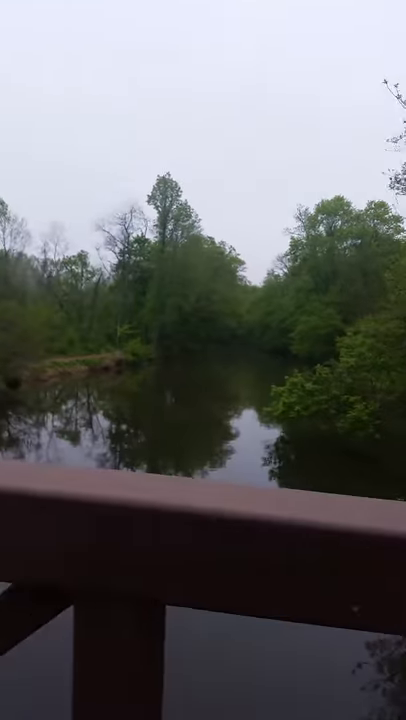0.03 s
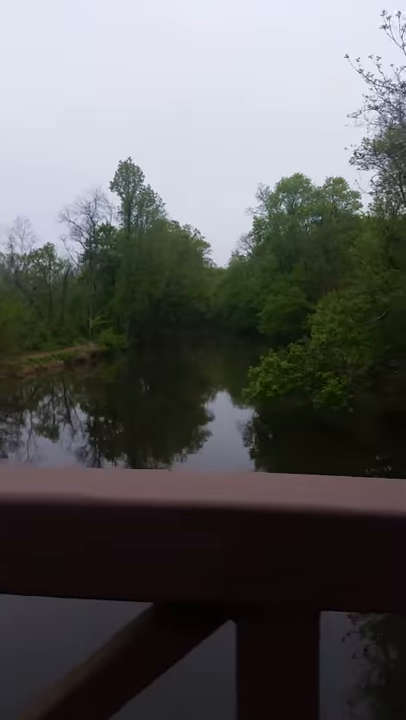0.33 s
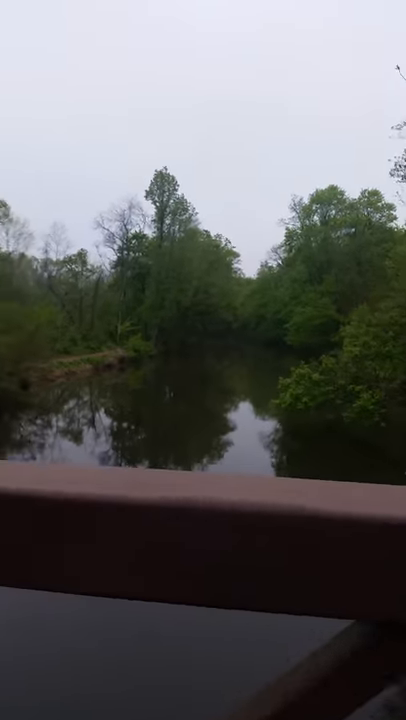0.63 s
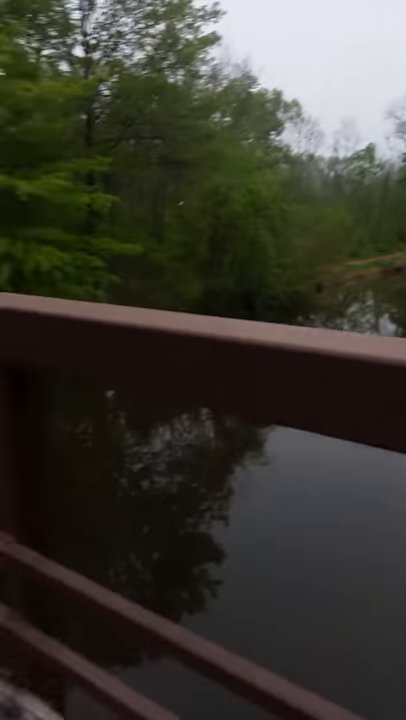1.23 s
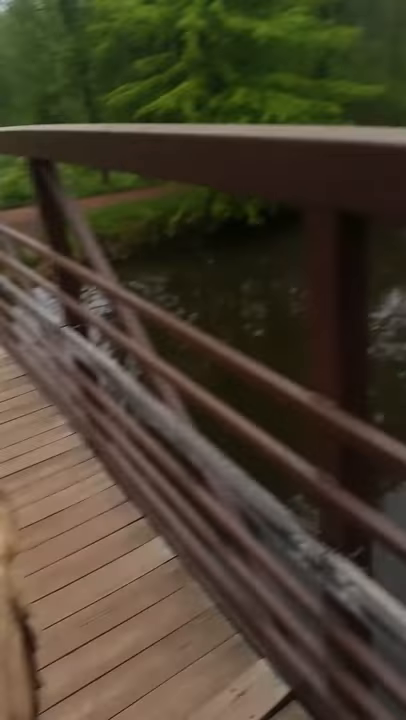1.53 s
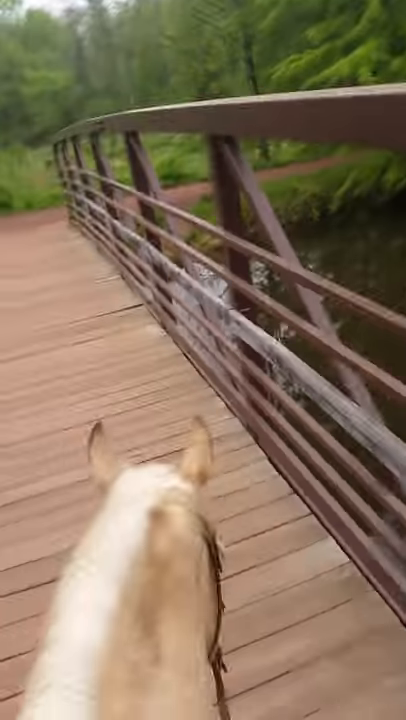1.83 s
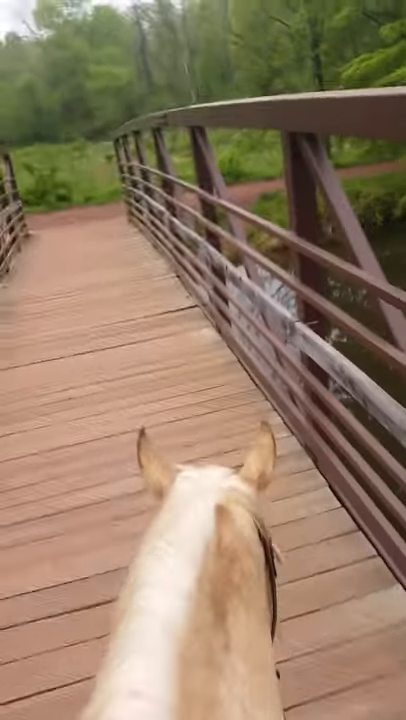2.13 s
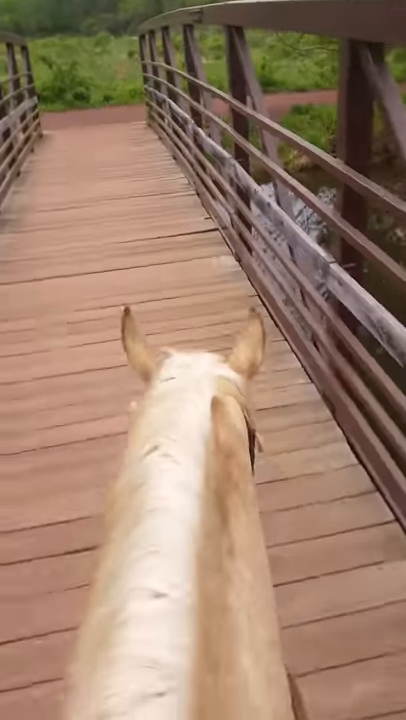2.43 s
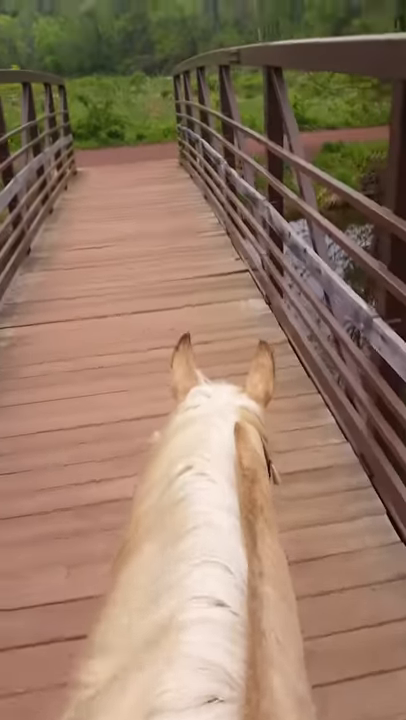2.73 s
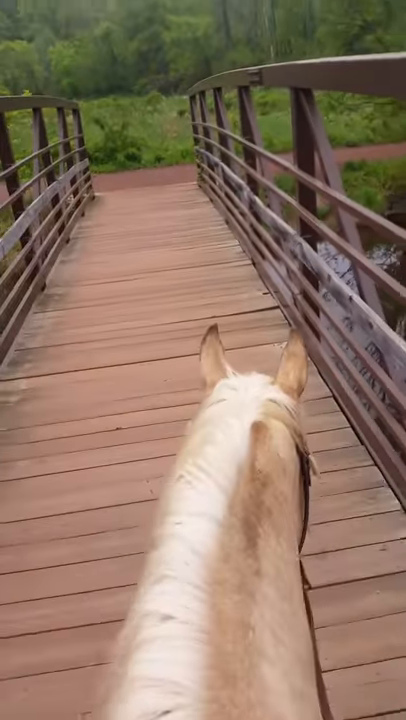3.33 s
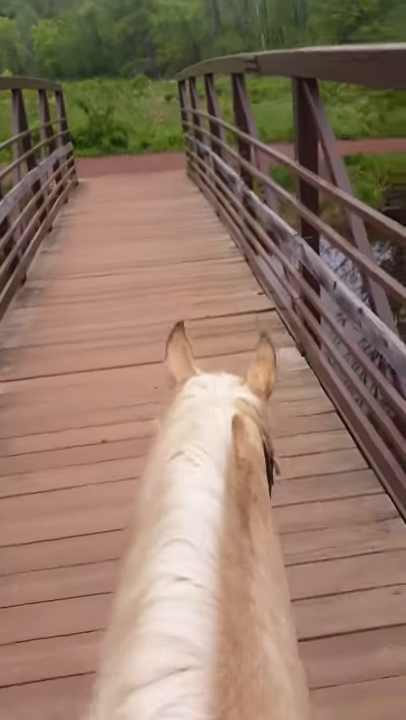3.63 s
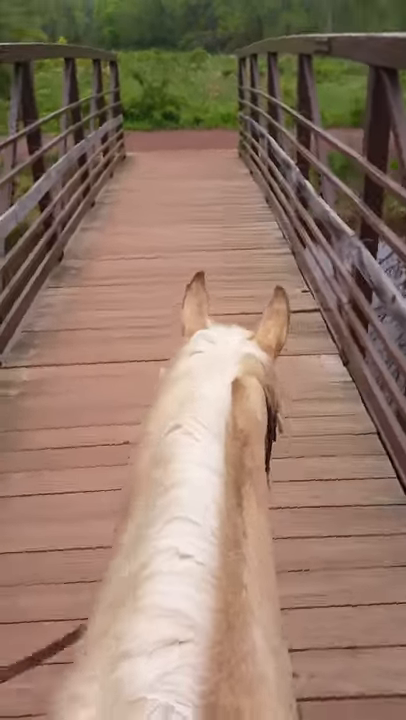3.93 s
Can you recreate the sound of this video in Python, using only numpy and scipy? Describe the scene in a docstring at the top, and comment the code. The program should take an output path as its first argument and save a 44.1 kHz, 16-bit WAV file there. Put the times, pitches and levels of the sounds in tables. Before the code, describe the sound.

A horse walks over a wooden footbridge, heard from the saddle, each hoof knocking on the planks with a hollow boom. A sparrow whistles and trills early on, distant birds warble, and the last step skids slightly.

```python
"""A horse walks over the plank deck of a steel footbridge, heard from the saddle with the right
microphone port muffled. From the start, over a low rumble of air, each hoof touches with its toe, lands,
knocks a plank and sets the whole span booming. In the first two seconds a sparrow whistles and trills
from the trees around the pond; farther birds warble on and off. Midway the tack ticks and a far bird
repeats an upslur. Near the end the rider's clothes rustle and the last hoof skids on the wood."""
import sys
import numpy as np
from scipy import signal
from scipy.fft import rfft, irfft, next_fast_len
from scipy.io import wavfile
from scipy.ndimage import map_coordinates

SR = 44100
rng = np.random.default_rng(int(sys.argv[2]) if len(sys.argv) > 2 else 0)


def transcribe(u):
    """Save the signal u as a 16-bit wav file named by the first command-line argument.

    u: samples, shape (n,) or (channels, n), limited to [-1, 1]; the rate is SR.
    q: integer samples, one column per channel.
    """
    v = np.clip(np.atleast_2d(u).T, -1, 1)
    q = np.round(v * 32767).astype(np.int16)
    wavfile.write(sys.argv[1], SR, q)


N = 176400


def amp(db):
    """The decibel law: 20 dB is a factor of ten in amplitude."""
    return 10 ** (np.asarray(db) / 20)


def unit_rms(x):
    """Power normalisation: the mean square becomes 1."""
    return x / np.sqrt(np.mean(x ** 2) + 1e-20)


def unit_energy(x):
    """Energy normalisation: each channel's squares sum to 1."""
    return x / np.linalg.norm(x, axis=-1, keepdims=True)


def decay(t, t60):
    """Exponential damping: 60 dB are lost in t60 seconds."""
    return amp(-60 * t / t60)


def along(points, hz):
    """Interpolation of (Hz, value) points on a logarithmic frequency axis."""
    freqs, values = np.transpose(points)
    return np.interp(np.log(hz + 1), np.log(freqs + 1), values)


def add(out, start, x):
    """Superposition: x joins out at start seconds."""
    i = max(0, round(start * SR))
    part = x[..., :max(0, out.shape[-1] - i)]
    out[..., i:i + part.shape[-1]] += part


def coloured(x, *curves):
    """Minimum-phase filtering by (Hz, dB) curves in cascade, whose decibels add."""
    n = x.shape[-1]
    size = 2 * next_fast_len(n // 2 + SR // 8)
    hz = np.fft.rfftfreq(size, 1 / SR)
    gain = amp(sum(along(curve, hz) for curve in curves))
    cepstrum = irfft(np.log(gain), size)
    cepstrum[1:size // 2] *= 2  # folding onto positive time makes the filter causal
    cepstrum[size // 2 + 1:] = 0
    return irfft(rfft(x, size) * np.exp(rfft(cepstrum)), size)[..., :n]


def stereo_noise(n, spread):
    """Partial coherence: shared white noise plus each side's own, weighted by spread."""
    return unit_rms(rng.standard_normal(n) + spread * rng.standard_normal((2, n)))


def shaped_noise(n, spectrum, spread):
    """Spectral shaping: white stereo noise takes on a filter's spectrum, at rms 1."""
    return unit_rms(coloured(stereo_noise(n, spread), spectrum))


def wobble(rate, n):
    """Random modulation: a smooth curve through rate random knots a second."""
    return map_coordinates(rng.standard_normal(SR // 20), [np.arange(n) / SR * rate])


def diffuse_tail(t60_curve, spread):
    """Modal overlap: a second of dense ringing acts as noise, each band dying at its own rate."""
    hz, t, bands = signal.stft(stereo_noise(SR, spread), SR, nperseg=256)
    bands = bands * decay(t, along(t60_curve, hz)[:, None])
    return signal.istft(bands, SR, nperseg=256)[1][:, :SR]


# Spectra of the air and of the leaves, the latter with a far bird chorus blurred in near 3.5 kHz. Each row:
# frequency in Hz, relative level in dB.
AIR_SPECTRUM = [(25, -9), (46, 13), (75, 7.5), (120, 4), (250, -4.5), (450, -18), (700, -20.5),
                (1100, -34.5), (2000, -53), (5000, -74)]
LEAF_SPECTRUM = [(2000, 17), (2800, 14), (3550, 14), (4200, 7), (5500, 12.5), (7500, 0), (10000, -25)]
def air(rumble_db=-35, swell_db=1.5, leaves_db=-64):
    """Amplitude modulation: low outdoor rumble swells a little under a faint, steady hiss of leaves, with a far
    chorus of birds blurred into it near 3.5 kHz."""
    rumble = shaped_noise(N, AIR_SPECTRUM, spread=.22)
    leaves = shaped_noise(N, LEAF_SPECTRUM, spread=.83)
    return amp(rumble_db + swell_db * wobble(rate=7, n=N)) * rumble + amp(leaves_db) * leaves


def whistle(length, start_hz, middle_hz, end_hz, db, waver_hz=11, waver_db=1.2):
    """Frequency modulation: a pure tone glides on a parabola, slightly unsteady in pitch and level."""
    n = int(length * SR)
    progress = np.arange(n) / n
    glide = np.polyfit([0, .5, 1], [start_hz, middle_hz, end_hz], 2)
    hz = np.polyval(glide, progress) + waver_hz * wobble(rate=70, n=n)
    ramp = np.clip(np.minimum(progress, 1 - progress) / .3, 0, 1)  # 30% rising, 30% fading
    envelope = amp(db + waver_db * wobble(rate=70, n=n)) * np.sin(np.pi / 2 * ramp)
    return envelope * np.sin(2 * np.pi * np.cumsum(hz) / SR)


def trill(length=.25, centre_hz=5220, fall_hz=193, sweep_hz=1150, strokes_per_s=65, db=-45):
    """Sawtooth frequency modulation: quick downstrokes merge into a buzz that swells, sinks and fades."""
    t = np.arange(int(length * SR)) / SR
    progress, stroke = t / length, t * strokes_per_s % 1
    hz = centre_hz + fall_hz * (.5 - progress) + sweep_hz * (.5 - stroke)
    envelope = amp(db) * np.sin(np.pi * progress) * np.sin(np.pi * stroke) ** 2
    return envelope * np.sin(2 * np.pi * np.cumsum(hz) / SR)


# Reverberation among the trunks. Each row: frequency in Hz, 60 dB decay time in seconds.
TRUNK_DECAY = [(3000, 1.9), (7000, 1.5)]
def through_trees(song, direct, trunks_db=-4, leaves_t60=.09):
    """Multipath propagation: song arrives straight, scattered by leaves and echoed among trunks."""
    t = np.arange(SR) / SR
    trunks = amp(trunks_db) * unit_energy(diffuse_tail(TRUNK_DECAY, spread=.67))
    leaves = unit_energy(stereo_noise(SR, spread=.93) * decay(t, leaves_t60))
    scattered = signal.fftconvolve(song[None], trunks + leaves, axes=1)[:, :N]
    return (direct * song + scattered) / np.hypot(1, direct)


# Bird notes. Each row: start and length in seconds, first, middle and last pitch in Hz, level in dB.
SPARROW_NOTES = [(0.269, 0.048, 6100, 7060, 7300, -63), (0.344, 0.22, 5010, 4946, 4878, -48.5),
                 (0.622, 0.032, 5620, 6840, 7100, -56), (0.973, 0.02, 5280, 4890, 4920, -45.5),
                 (1.091, .115, 7340, 6710, 6600, -50), (1.201, 0.028, 5040, 5010, 5240, -51),
                 (1.285, 0.04, 6040, 6730, 7300, -56), (1.406, 0.15, 7600, 7060, 7080, -51.5),
                 (1.541, 0.028, 5240, 4950, 4900, -53), (1.635, 0.051, 5800, 6920, 7450, -58)]
WARBLER_NOTES = [(0.062, 0.079, 3590, 3180, 2610, -54), (0.115, 0.054, 3320, 3770, 3120, -54.5),
                 (1.159, 0.11, 4960, 3360, 2370, -61), (1.269, 0.13, 2590, 3610, 3575, -55.5),
                 (2.416, 0.13, 4090, 4360, 4300, -59), (2.518, 0.057, 5500, 4500, 3950, -57.5),
                 (2.597, 0.036, 3760, 3160, 2750, -55.5), (2.623, 0.064, 3080, 3820, 2530, -53.5),
                 (2.689, 0.041, 2620, 3540, 5010, -51), (2.741, 0.057, 3476, 3580, 3510, -56),
                 (3.72, 0.12, 5280, 3470, 2420, -58), (3.881, 0.11, 5120, 3560, 2460, -53.5)]
# A far bird's upslur: one such row without the start.
UPSLUR = (.075, 1900, 2850, 3600, -62)
def birds(trill_start=.725, upslur_start=1.435, upslur_period=.178, gain_db=-2):
    """Direct-to-reverberant ratio conveys distance: the sparrow is near, the other birds farther off."""
    near, far = np.zeros((2, N))
    for start, *note in SPARROW_NOTES:
        add(near, start, whistle(*note))
    add(near, trill_start, trill())
    for start, *note in WARBLER_NOTES:
        add(far, start, whistle(*note))
    for k in range(6):
        add(far, upslur_start + k * upslur_period, amp(rng.normal(0, 2)) * whistle(*UPSLUR))
    return amp(gain_db) * (through_trees(near, direct=1.1) + through_trees(far, direct=.6))


# Brushes of the rider's clothes. Each row: start in seconds, length in seconds, peak level in dB.
CLOTH_BRUSHES = [(0, .35, -72.5), (3.1, 0.48, -68.5), (3.653, 0.43, -62)]
# Their spectrum. Each row: frequency in Hz, relative level in dB.
CLOTH_SPECTRUM = [(1500, 3), (5500, 3.5), (8000, -4.5), (11000, -12.5)]
def rustle():
    """Friction noise: cloth brushes softly as the rider sways."""
    envelope = np.zeros(N)
    for start, length, db in CLOTH_BRUSHES:
        add(envelope, start, amp(db) * np.hanning(int(length * SR)))
    return envelope * shaped_noise(N, CLOTH_SPECTRUM, spread=3.2)


def snap(db, spectrum, t60=.04):
    """A contact transient: a brief touch gives a broad band of quickly damped noise."""
    t = np.arange(SR // 5) / SR
    return amp(db) * decay(t, t60) * shaped_noise(len(t), spectrum, spread=.41)


# Ticks of the tack. Each row: start in seconds, level in dB.
TACK_TICKS = [(1.612, -35.5), (1.615, -48), (2.495, -44)]
# Their spectrum. Each row: frequency in Hz, relative level in dB.
TACK_SPECTRUM = [(500, -2.5), (1100, 16.5), (2500, 8.5), (6500, 2.5), (10000, -24.5), (15000, -7.5)]
def tack():
    """Light impacts: bridle and saddle give small, bright ticks."""
    out = np.zeros((2, N))
    for start, db in TACK_TICKS:
        add(out, start, snap(db, TACK_SPECTRUM))
    return out


DECK_SPREAD = .55
# Damping of the deck. Each row: frequency in Hz, 60 dB decay time in seconds.
DECK_DECAY = [(50, 0.81), (160, 1), (420, 0.4), (1100, 0.53), (2000, 0.36), (3300, 0.18), (9000, 0.047)]
def deck_ring():
    """Structural reverberation: many loose planks and girders answer a blow."""
    return diffuse_tail(DECK_DECAY, DECK_SPREAD) / np.sqrt(SR / 20)


# Loose planks bumping under the horse. Each row: start in seconds, pitch in Hz, level in dB.
PLANK_BUMPS = [(.022, 193.4, -11.5), (0.115, 125, -20.5), (.672, 136, -21), (1.358, 241.3, -16),
               (1.489, 112, -12), (1.706, 320, -19.5), (2.072, 115.8, -9.5), (2.854, 145.3, -19),
               (3.58, 220.3, -15)]
def loose_planks(t60=.17, ring_db=-10):
    """Damped resonance: planks drop on their girders as the weight shifts, each with a hollow note."""
    out, t = np.zeros((2, N)), np.arange(SR // 3) / SR
    for start, hz, db in PLANK_BUMPS:
        blow = amp(ring_db) * deck_ring()
        blow[:, 0] += 1  # the direct impulse
        attack = 1 - np.exp(-2 * hz * t)
        note = amp(db) * attack * decay(t, t60) * np.sin(2 * np.pi * hz * t)
        add(out, start, signal.fftconvolve(blow, note[None], axes=1))
    return out


# Spectrum of a hoof sliding on wood. Each row: frequency in Hz, relative level in dB.
SKID_SPECTRUM = [(400, -29), (680, 8.5), (1060, 6), (1250, -20), (8000, -59)]
def skid(start=3.891, db=-25, attack_s=.0024, t60=.26, roughness=1.2):
    """Sliding friction: the last hoof skids a little over the grain of the wood."""
    out, t = np.zeros((2, N)), np.arange(SR // 3) / SR
    slips = stereo_noise(len(t), DECK_SPREAD) * np.exp(roughness * rng.uniform(-1.3, 1, len(t)))
    envelope = amp(db) * (1 - np.exp(-t / attack_s)) * decay(t, t60)
    add(out, start, envelope * unit_rms(coloured(slips, SKID_SPECTRUM)))
    return out


# Modes of the span. Each row: frequency in Hz, level relative to the boom in dB, decay time in seconds.
SPAN_MODES = [(48.95, -5.5, 1.1), (112.67, -9.5, 1.55), (147.8, -17.5, 1.36)]
def span_boom(boom_db, attack_s=.00093, detune=.0073):
    """Free vibration: after a blow the whole span swings on in its low modes."""
    t, boom = np.arange(SR) / SR, np.zeros(SR)
    for hz, db, t60 in SPAN_MODES:
        hz *= 1 + rng.normal(0, detune)
        boom -= amp(boom_db + db) * decay(t, t60) * np.sin(2 * np.pi * hz * t)
    return boom * (1 - np.exp(-t / attack_s))


# Modes of plank and steel railing. Each row: frequency in Hz, level in dB, decay time in seconds.
PLANK_MODES = [(183.9, -21, .25), (361.5, -28, 0.14), (413.5, -20, 0.17), (595.7, -24, 0.16),
               (858, -12.5, 0.077), (936.3, -21, 0.13), (1064, -24, 0.028), (1270, -17, 0.11),
               (1572, -22, 0.21)]
RAILING_MODES = [(708, -28.5, 1), (1280, -26, 0.88)]
def plank_and_railing(hollow_hz, hollow_db=-16, hollow_t60=.15, push_db=-9, detune=.024, vary_db=1.68):
    """Modal superposition: a struck plank knocks with its own hollow note and the railing rings on."""
    t, response = np.arange(SR) / SR, np.zeros(SR)
    for hz, db, t60 in PLANK_MODES + RAILING_MODES:
        gain = amp(db + rng.normal(0, vary_db))
        hz *= 1 + rng.normal(0, detune)
        mode = unit_energy(np.cos(2 * np.pi * hz * t) * decay(t, t60))
        response += gain * rng.choice([-1, 1]) * mode
    response += amp(hollow_db) * unit_energy(np.cos(2 * np.pi * hollow_hz * t) * decay(t, hollow_t60))
    response[0] += amp(push_db)  # the direct impulse
    return response


# Spectra of the wooden deck and the shoe's click. Each row: frequency in Hz, relative level in dB.
WOOD_SPECTRUM = [(28, 22.5), (46, 35), (90, 44.5), (200, 46.5), (400, 45), (850, 38.5), (1100, 39.5),
                 (1700, 38.5), (2300, 33), (3200, 13.5), (9000, -22.5)]
SHOE_SPECTRUM = [(800, -11.5), (2200, 16), (5000, -1.5), (7500, -7), (10000, -32), (15000, -29)]
# Hoof falls. Each row: start in seconds, toe lead in seconds, the plank's hollow note in Hz,
# gains of the boom, body, knock and clack bands in dB, level of the shoe click in dB.
HOOF_FALLS = [(.007, .004, 192, -14, -17.5, -23.5, -44.5, -45.5),
              (0.347, .004, 417, -18.5, -21.5, -25.5, -45, -38),
              (.662, 0.0066, 189.3, -19, -24.5, -33, -41, -73),
              (.961, 0.0024, 425, -21, -30.5, -42.5, -43, -39),
              (1.331, 0.0068, 237, -18.5, -22, -26, -42, -48.5),
              (1.691, .002, 338, -36.5, -24, -29, -55, -42),
              (2.065, .006, 410, -24, -27, -25.5, -38.5, -41.5),
              (2.481, 0.0021, 290.4, -33, -22, -31.5, -55.5, -41.5),
              (2.786, 0.00524, 405, -15.5, -21.5, -32, -57.5, -52.5),
              (3.184, 0.0018, 187, -22, -21.5, -24, -39.5, -37),
              (3.5, 0.0064, 236, -17, -22, -23, -35.5, -67.5),
              (3.835, 0.0018, 296, -22.5, -27, -37.5, -41, -47.5),
              (3.888, 0.0035, 169.4, -18, -20, -41, -47.5, -38)]
BOOM_HZ, BODY_HZ, KNOCK_HZ, CLACK_HZ = 92, 270, 725, 1630
def hooves(toe_db=-8.5, roll_s=.018, roll_db=-15, clatter_db=-2, clatter_t60=.039, deck_db=4):
    """Impact excitation: a hoof touches with its toe, lands and rolls flat, and the bridge rings on."""
    out, t = np.zeros((2, N)), np.arange(SR) / SR
    for start, lead, hollow_hz, boom_db, body_db, knock_db, clack_db, click_db in HOOF_FALLS:
        response = plank_and_railing(hollow_hz)
        roll_delay = lead + roll_s * rng.uniform(.48, 1.4)
        blow = np.zeros((2, SR))
        for delay, db in [(0, toe_db), (lead, 0), (roll_delay, roll_db)]:
            clatter = unit_energy(stereo_noise(SR, DECK_SPREAD) * decay(t, clatter_t60))
            add(blow, delay, amp(db) * (response + amp(clatter_db) * clatter))
        add(blow, lead, amp(deck_db) * deck_ring())
        tone = [(BOOM_HZ, boom_db), (BODY_HZ, body_db), (KNOCK_HZ, knock_db), (CLACK_HZ, clack_db)]
        add(out, start, coloured(blow, WOOD_SPECTRUM, tone))
        add(out, start + lead, span_boom(boom_db))
        add(out, start + lead, snap(click_db, SHOE_SPECTRUM))
    return out


def scene():
    """Linear superposition: the pressures of all sources around the rider add."""
    return hooves() + skid() + loose_planks() + tack() + rustle() + birds() + air()


# Imbalance of the microphone ports. Each row: frequency in Hz, level of left over right in dB.
PORT_IMBALANCE = [(60, -1), (125, 0.9), (250, 1.5), (500, 6), (1000, 7.5), (2000, 8), (4500, 21)]
# Spectrum of the microphone's hiss. Each row: frequency in Hz, relative level in dB.
HISS_SPECTRUM = [(9000, -9), (13000, 5.5), (15500, 6.5)]
def record(dry, left_lag_s=.00019, hiss_db=-72, top_hz=15780):
    """Level and time differences: the right port is muffled and early; hiss and a band limit follow."""
    size = next_fast_len(N + SR // 2)
    hz = np.fft.rfftfreq(size, 1 / SR)
    ratio = amp(along(PORT_IMBALANCE, hz))
    gains = np.array([2 * ratio, np.full_like(hz, 2)]) / (1 + ratio)
    delays = np.exp(np.outer([-1, 1], 1j * np.pi * hz * left_lag_s))
    hiss = amp(hiss_db) * unit_rms(coloured(rng.standard_normal((2, N)), HISS_SPECTRUM))
    spectrum = rfft(dry, size) * gains * delays + rfft(hiss, size)
    return irfft(spectrum * (hz < top_hz), size)[:, :N]


dry = scene()
out = record(dry)
transcribe(out)
```